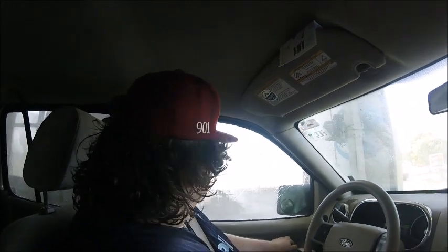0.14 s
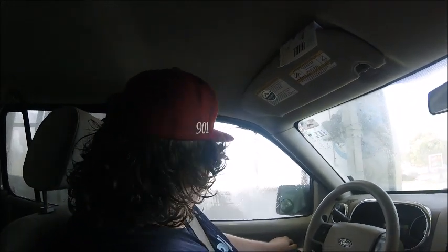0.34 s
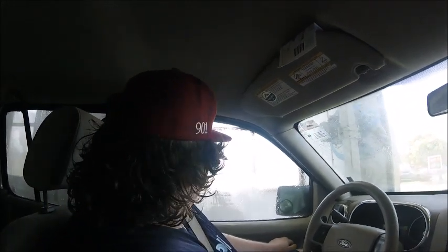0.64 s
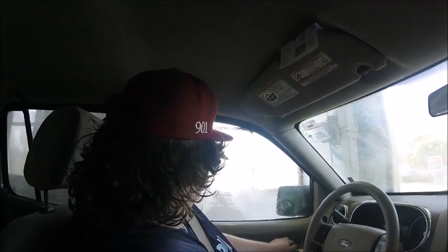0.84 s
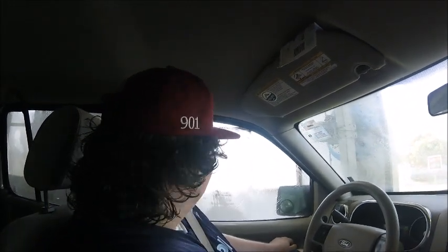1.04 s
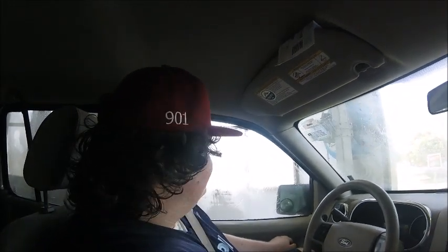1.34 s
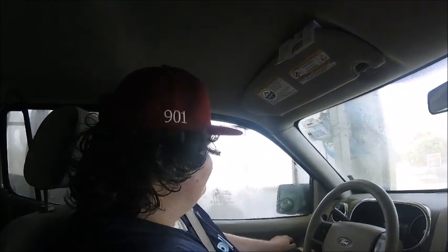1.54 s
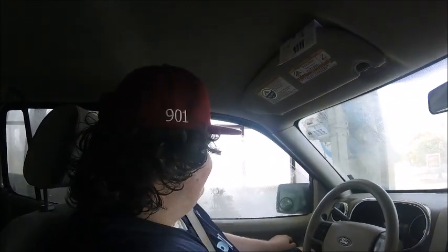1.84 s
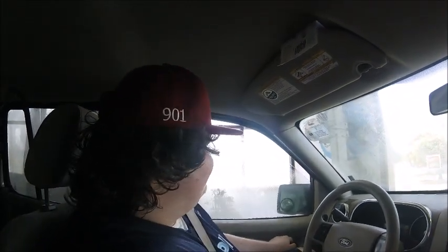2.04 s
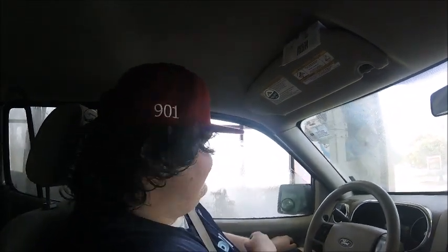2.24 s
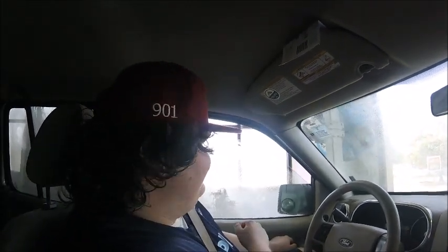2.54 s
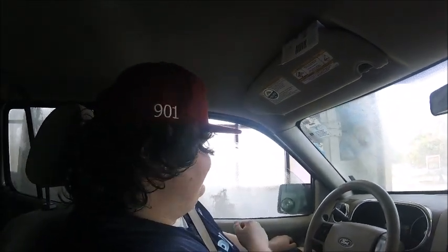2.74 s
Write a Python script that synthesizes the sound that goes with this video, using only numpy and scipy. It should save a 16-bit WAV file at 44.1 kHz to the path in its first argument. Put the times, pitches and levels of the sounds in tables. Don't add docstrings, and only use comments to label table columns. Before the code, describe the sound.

Automatic car wash roaring steadily around a closed car, heard from inside the booming cabin

```python
import sys
import numpy as np
from scipy import signal
from scipy.fft import rfft, irfft
from scipy.io import wavfile
from scipy.ndimage import uniform_filter1d

SR = 44100
rng = np.random.default_rng(int(sys.argv[2]) if len(sys.argv) > 2 else 0)


def materialize(psi):
    bounded = np.clip(np.atleast_2d(psi).T, -1, 1)
    quanta = np.round(bounded * 32767).astype(np.int16)
    wavfile.write(sys.argv[1], SR, quanta)


def amplitude_ratio(level_db):
    exponent = np.asarray(level_db, float) / 20
    return 10 ** exponent


N = 127890
T = np.arange(N) / SR


def level(x, db):
    return x * amplitude_ratio(db) / np.sqrt(np.mean(x ** 2))


def along(table, column=1):
    rows = np.array(table, float)
    return np.interp(T, rows[:, 0], rows[:, column])


def band(x, hz, width_hz):
    f = np.fft.rfftfreq(N, 1 / SR) + 1e-3
    detuning = (f - hz * hz / f) / width_hz
    return level(irfft(rfft(x) / (1 + detuning ** 2), N), 0)


def walk(rate):
    k = int(SR / rate)
    held = np.repeat(rng.standard_normal(N // k + 1), k)
    return 1.3 * uniform_filter1d(uniform_filter1d(held, k), k)[:N]


def low(x, hz):
    return signal.sosfiltfilt(signal.butter(6, hz, fs=SR, output="sos"), x)


def roar(shape, source, gain_db):
    hz_db, out = np.array(shape, float), 0
    for hz in 28 * 2 ** np.arange(0, 9, 1 / 3):
        density_db = np.interp(np.log(hz), np.log(hz_db[:, 0]), hz_db[:, 1], left=-99, right=-99)
        band_db = density_db + 10 * np.log10(hz)
        out = out + band(source(), hz, hz / 3) * amplitude_ratio(band_db + gain_db(hz))
    return out


def body():
    # f/Hz, level per Hz/dB
    body_spectrum = [(15, -28), (25, 2), (81, -6), (118, -8), (172, -24), (256, 0.5), (293, -19),
                     (327, -18.5), (5000, -61.5), (6500, -88), (11000, -120)]
    # f/Hz, width/Hz, level/dB
    body_modes = [(70, 20, -34), (105.8, 7.5, -37), (128.6, 58, -32), (156.7, 29, -42), (1560, 5.3, -61.5),
                  (1810, 22, -72.5)]
    swell_db, flicker_db = -1, 1.5
    swell = swell_db * walk(1.05)
    wide = roar(body_spectrum, lambda: rng.standard_normal(N), lambda hz: swell + flicker_db * walk(6.12))
    modes = 0
    for hz, width_hz, db in body_modes:
        modes = modes + amplitude_ratio(db + flicker_db * walk(4.09)) * band(rng.standard_normal(N), hz, width_hz)
    return level(wide, -25.5) + modes


def boom():
    # t/s, f/Hz, level/dB
    air_mode = [(0.0, 52.1, -58), (0.14, 46.61, -26.5), (0.77, 47.4, -20.5), (0.95, 43.86, -22),
                (1.02, 41.9, -23), (1.18, 37.97, -40), (1.22, 37.8, -17.5), (1.36, 38.35, -28),
                (1.61, 44.14, -21), (1.7, 45.7, -24), (1.77, 43.6, -16), (1.89, 45.54, -36),
                (1.99, 44.5, -21.5), (2.27, 40, -30), (2.48, 43.66, -19.5), (2.62, 43.1, -24.5),
                (2.79, 47, -21), (2.9, 45.2, -57)]
    trim_db, wander, flutter_db = -1, .05, 1.5
    hz = along(air_mode) * (1 + wander * walk(18))
    loudness_db = along(air_mode, column=2) + trim_db + flutter_db * walk(14)
    return np.sqrt(2) * np.sin(2 * np.pi * np.cumsum(hz) / SR) * amplitude_ratio(loudness_db)


def panel():
    # t/s, level/dB
    roof_drive = [(0, -21), (.1, -40), (.17, -18.5), (.3, -31), (.45, -27), (.8, -29), (1, -33),
                  (1.7, -35.5), (2.03, -35.5), (2.08, -49), (2.13, -38.5), (2.2, -19), (2.27, -25),
                  (2.35, -25), (2.45, -30), (2.55, -32), (2.7, -21), (2.82, -32.5)]
    # f/Hz, width/Hz, level/dB
    roof_modes = [(255.6, 22, -0.5), (228.5, 14, -4), (201.5, 16, -6.5), (328, 66, -7.5)]
    hum = sum(amplitude_ratio(db) * band(rng.standard_normal(N), hz, width_hz) for hz, width_hz, db in roof_modes)
    return level(hum, -3.5) * amplitude_ratio(along(roof_drive))


def door():
    # t/s, level/dB
    spray = [(0, -39), (.4, -38), (.56, -33.5), (.75, -35.5), (1.0, -34), (1.12, -32), (1.22, -37),
             (1.38, -35.5), (1.6, -37.5), (1.85, -35.5), (2.05, -40.5), (2.3, -38.5), (2.6, -45.5),
             (2.7, -40), (2.8, -47), (2.9, -36)]
    # f/Hz, width/Hz, level/dB
    skin_modes = [(419, 63, 1.5), (491, 48, 2.5), (542, 55, -7.5), (654.5, 47, -5), (750, 150, -2.5),
                  (857, 420, -13)]
    skin = 0
    for hz, width_hz, db in skin_modes:
        skin = skin + amplitude_ratio(db + 1.1 * walk(8)) * band(rng.standard_normal(N), hz, width_hz)
    return level(skin, -0.92) * amplitude_ratio(along(spray))


def thumps():
    # t/s, length/s, f/Hz, glide/(Hz/s), level/dB
    gusts = [(.14, 0.027, 107.4, 0, -25), (.17, 0.032, 259.3, 2, -23), (.22, .03, 111, -2, -27),
             (.3, 0.033, 259.8, -1, -21.5), (.6, 0.027, 139.6, -3, -23.5), (.73, 0.021, 136, 2, -31.5),
             (.81, 0.041, 253, 0, -26.5), (.9, 0.019, 129, 0, -19.5), (1.01, 0.044, 118, 2, -26.5),
             (1.13, 0.031, 129, 0, -26.5), (1.42, 0.02, 104, -2, -23), (1.7, 0.048, 90.7, 0, -26),
             (1.86, 0.039, 285, 0, -32), (1.94, .02, 129, 0, -27), (2.08, 0.032, 234, -200, -31),
             (2.13, 0.019, 122, 0, -30), (2.21, 0.025, 254.6, -200, -25), (2.215, 0.022, 137, -1, -24),
             (2.37, 0.025, 243.6, -500, -28.5), (2.42, .03, 142, -4, -24.5), (2.46, 0.014, 185, -3, -21.5),
             (2.6, 0.037, 208.3, 3, -26.5), (2.71, 0.06, 234, 496, -23.5), (2.71, 0.029, 148, 1, -25.5),
             (2.87, 0.038, 118.5, 303, -26), (.58, 0.051, 485, 0, -34.5), (1.05, 0.032, 484, 200, -45),
             (1.09, 0.017, 766, 0, -50), (1.15, 0.018, 698, 300, -38.5), (2.3, 0.038, 750, -2, -46),
             (2.72, 0.032, 500, 402, -38.5), (2.81, 0.046, 750, 200, -46.5), (0.366, 0.055, 63, 0.5, -23),
             (1.109, .04, 73, -4, -27.5), (1.5, 0.037, 165, 0, -30.5), (1.75, .05, 191, 0, -31.5),
             (2.55, 0.034, 225, -2, -30), (2.332, 0.023, 330, -2, -29), (0.098, 0.043, 237, 0, -34),
             (1.26, 0.047, 259.6, 0, -36)]
    out = 0
    for s, length, hz, glide, db in gusts:
        since = T - s
        swell = np.exp(-(since / length) ** 2)
        out = out + np.sqrt(2) * amplitude_ratio(db) * swell * np.sin(2 * np.pi * (hz + glide * since / 2) * since)
    return out


def splashes():
    # t/s, centre f/Hz, level/dB, ring/s (for a fall of 20 dB)
    slaps = [
        (.05, 800, -44, .02),
        (.491, 800, -42, .015),
        (.655, 9500, -66, .03),
        (1.814, 850, -32, .035),
        (1.894, 1500, -42, .01),
        (2.25, 670, -35, .012),
        (2.413, 10000, -66, .006),
        (2.435, 11500, -74, .006),
        (2.48, 1600, -45, .02),
    ]
    out = 0
    for s, hz, db, ring in slaps:
        fall = (T > s) * np.exp(-np.log(1000) * np.abs(T - s) / (3 * ring))
        out = out + amplitude_ratio(db) * band(rng.standard_normal(N), hz, hz * 0.5) * fall
    return out


def jet():
    # t/s, level/dB
    jet_force = [(0, -48.5), (.4, -47.5), (.43, -45), (.5, -40), (.58, -40.5), (.665, -41), (.7, -43),
                 (1.12, -42), (1.2, -43.5), (1.55, -44.5), (1.6, -43.5), (1.7, -44), (1.8, -43.5),
                 (1.83, -41.5), (1.9, -40.5), (1.92, -45.5), (2.45, -45), (2.9, -44.5)]
    # f/Hz, level per Hz/dB
    glass_spectrum = [(800, -11.5), (2020, -14), (2700, -24), (4300, -24), (5700, -32), (7660, -36.5),
                      (9900, -80), (14000, -45)]
    # f/Hz, width/Hz, level re jet/dB, extra level per dB of force/dB
    glass_modes = [(6420, 630, -13, 0.23), (11250, 480, -37, 0.1), (8400, 840, -35.5, 2),
                   (3250, 1500, -8.5, -1), (1950, 550, -7.5, 0.37)]
    trim_db, flicker_db, treble_follows = -1.5, 1.5, 0.43
    drop_spread_db, drop_ring_s = 1.2, 0.00076
    arrives_s, rise_s, dry_treble_db = .45, 0.0083, -5.5

    force = along(jet_force)
    push = force - force.mean()
    k = int(SR * .001)
    sizes = amplitude_ratio(drop_spread_db * np.repeat(rng.exponential(size=N // k + 1), k)[:N])
    sizes = signal.lfilter([1], [1, -np.exp(-1 / (drop_ring_s * SR))], sizes)
    gust = .25 * walk(14)
    away = dry_treble_db / (1 + np.exp(np.clip((T - arrives_s) / rise_s, -50, 50)))

    def drops():
        return sizes * rng.standard_normal(N)

    def bright(hz):
        return ((treble_follows - 1) * push + away) * min(hz / 6000, 1) ** 2

    wide = level(roar(glass_spectrum, drops, lambda hz: bright(hz) + gust + flicker_db * walk(15)), 0)
    wide = wide / np.std(wide - low(wide, 1000))
    thin = 0
    for hz, width_hz, db, more in glass_modes:
        thin = thin + amplitude_ratio(db + bright(hz) + gust + more * push) * band(drops(), hz, width_hz)
    return (wide + thin) * amplitude_ratio(force + trim_db)


def scene():
    return (body() + boom() + panel() + door() + thumps() + splashes() + jet())[None]


def thinned(x):
    thin_from_hz, keep_ratio, scatter_db = 6900, .93, 1.8
    top_hz, top_wander_hz, sink_hz_per_s = 14100, 450, 380
    f, t, z = signal.stft(x, SR, nperseg=1536, noverlap=1152)
    size = np.abs(z)
    usual = uniform_filter1d(uniform_filter1d(size, size=16, axis=-2), size=5, axis=-1)
    moods = rng.standard_normal((len(f) // 16 + 1, len(t) // 7 + 1))
    patches = np.repeat(np.repeat(moods, 16, axis=0), 7, axis=1)[:len(f), :len(t)]
    bar = keep_ratio * amplitude_ratio(scatter_db * patches)
    steps = np.repeat(rng.standard_normal(len(t) // 5 + 1), 5)[:len(t)]
    ceiling = top_hz - sink_hz_per_s * t + top_wander_hz * steps
    weak = uniform_filter1d(size, size=4, axis=-1) < bar * usual
    z = z * ~((weak & (f[:, None] > thin_from_hz)) | (f[:, None] > ceiling))
    return signal.istft(z, SR, nperseg=1536, noverlap=1152)[1][..., :N]


def treble_losses(x):
    # t/s, length/s, holes from f/Hz, share of bands lost low down, sliver f/Hz
    dropouts = [(.083, .011, 4200, 1, 6200), (.358, .01, 4200, 1, 6200), (.698, .011, 4200, 1, 6200),
                (.806, .013, 3200, .6, 5150), (.870, .009, 3400, .35, 5200), (1.042, .011, 4300, .7, 4900),
                (1.253, .013, 4000, 1, 5050), (1.577, .011, 3000, .5, 5200), (1.743, .014, 3200, .8, 5000),
                (2.087, .015, 4200, 1, 5700), (2.662, .011, 4300, 1, 5200), (2.769, .01, 4200, 1, 6200)]
    loss_db, hole_hz, surely_lost_hz = -36, 260, 4600
    sliver_db, sliver_s = -57, .012
    out = x.copy()
    for s, length, hz, share, sliver_hz in dropouts:
        near = slice(int((s - .04) * SR), int((s + .04) * SR))
        since = T[near] - s
        f = np.fft.rfftfreq(len(since), 1 / SR)
        lost = (rng.random(99)[(f // hole_hz).astype(int)] < share) & (f > hz)
        spared = (f > 6050) & (f < 6850)
        lost = (lost | (f > surely_lost_hz)) & ~spared
        gone = np.clip(1.5 - 2 * np.abs(since) / length, 0, 1) * (1 - amplitude_ratio(loss_db))
        taper = np.hanning(len(gone)) + 1e-9
        out[:, near] -= gone * irfft(rfft(x[:, near] * taper) * lost, len(gone)) / taper
        sliver = np.exp(-(since / sliver_s) ** 2) * np.sin(2 * np.pi * sliver_hz * T[near])
        out[:, near] += amplitude_ratio(sliver_db) * sliver
    return out


def roll_off(x):
    return signal.sosfilt(signal.butter(12, 14000, fs=SR, output="sos"), x)


def record(dry):
    opened = dry * np.clip(T / .004, 0, 1)
    return roll_off(treble_losses(thinned(opened)))


dry = scene()
out = record(dry)
materialize(out)
```